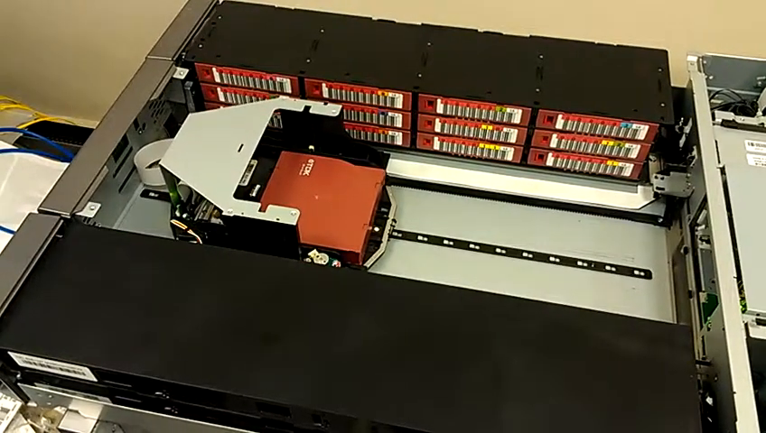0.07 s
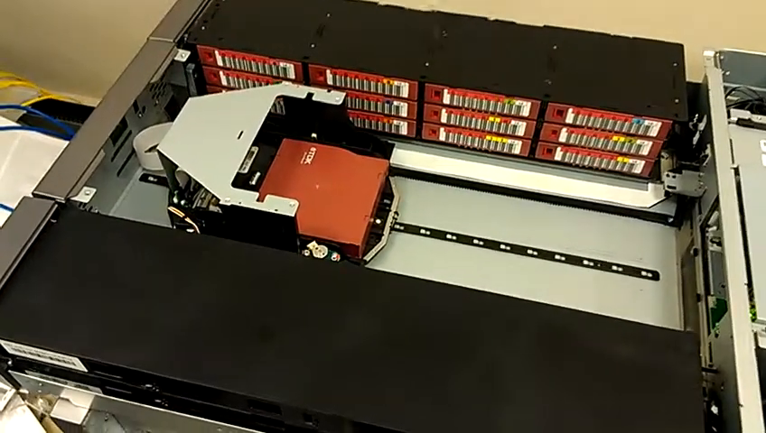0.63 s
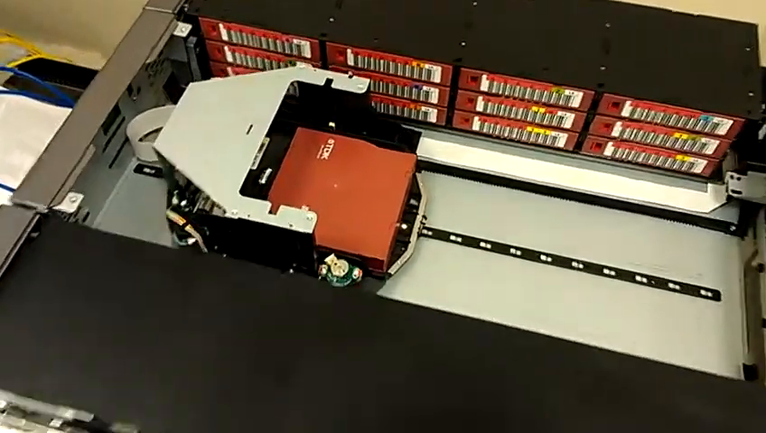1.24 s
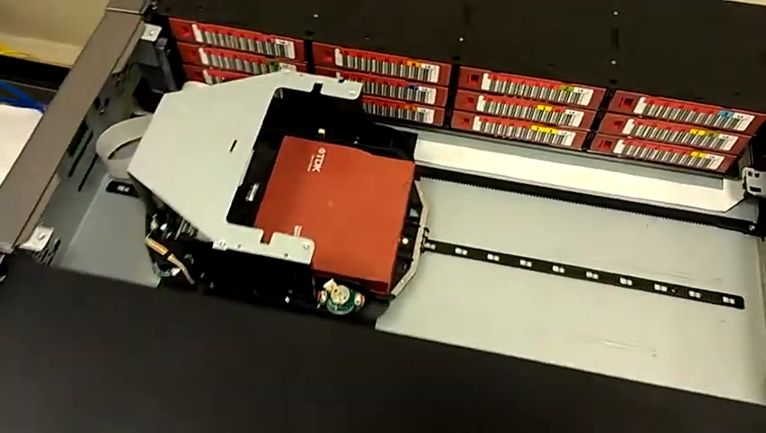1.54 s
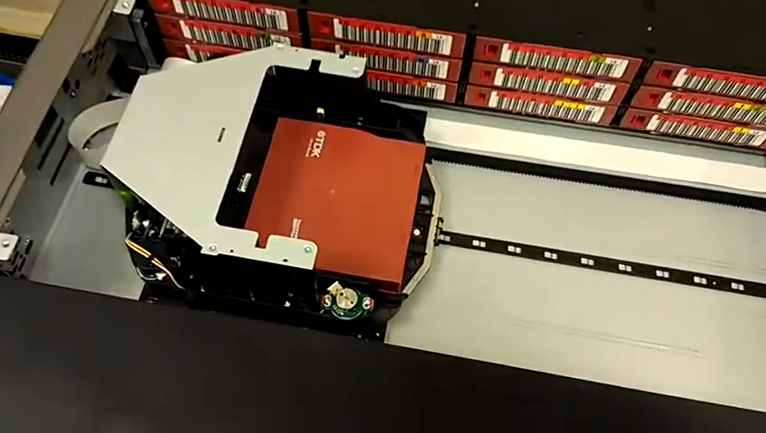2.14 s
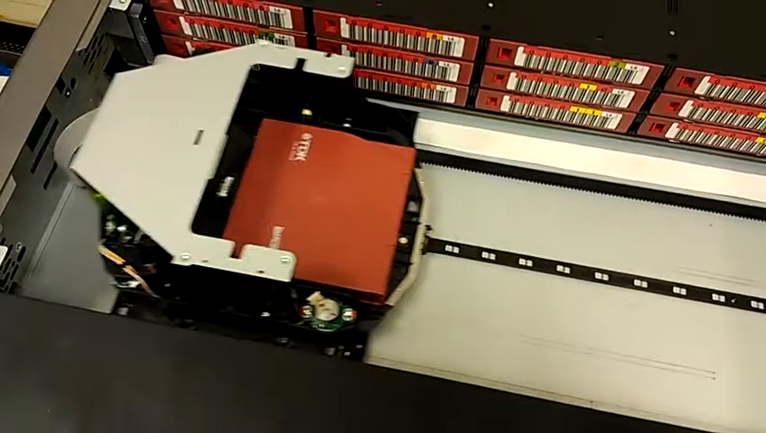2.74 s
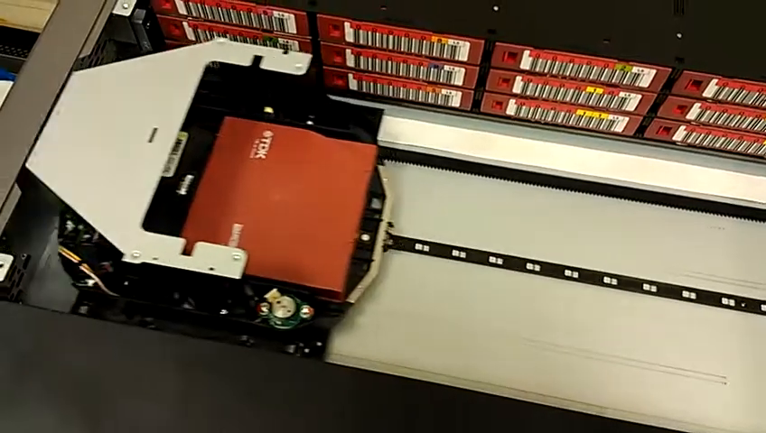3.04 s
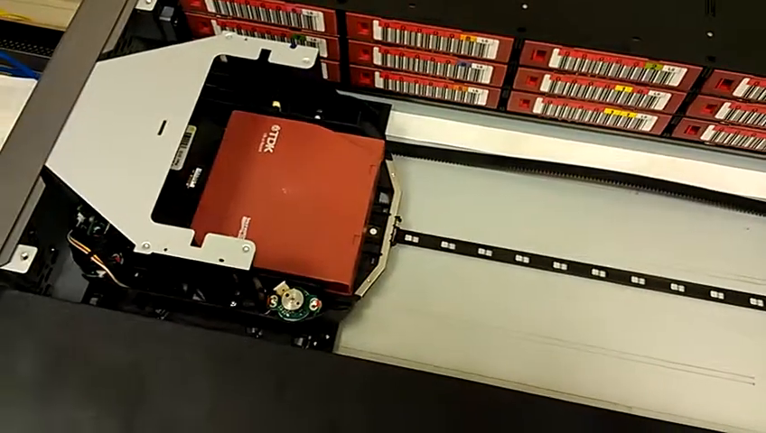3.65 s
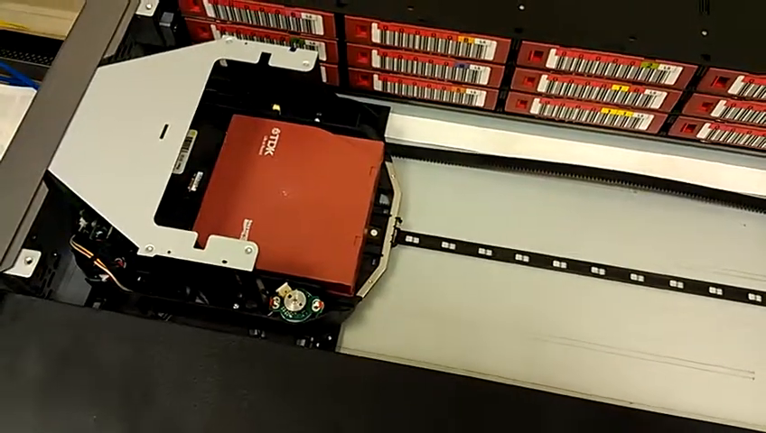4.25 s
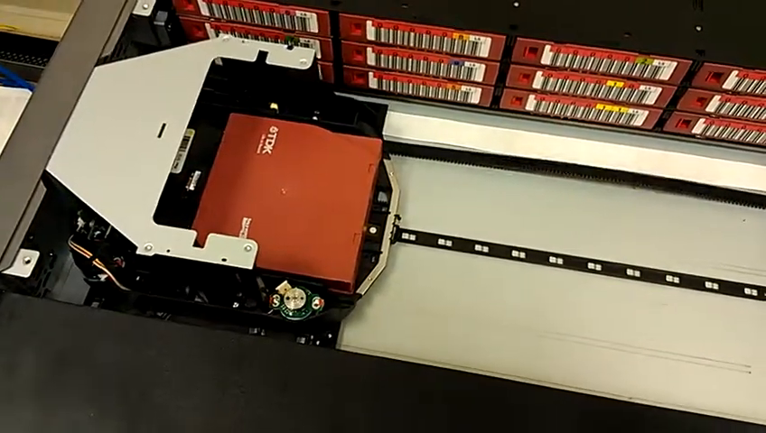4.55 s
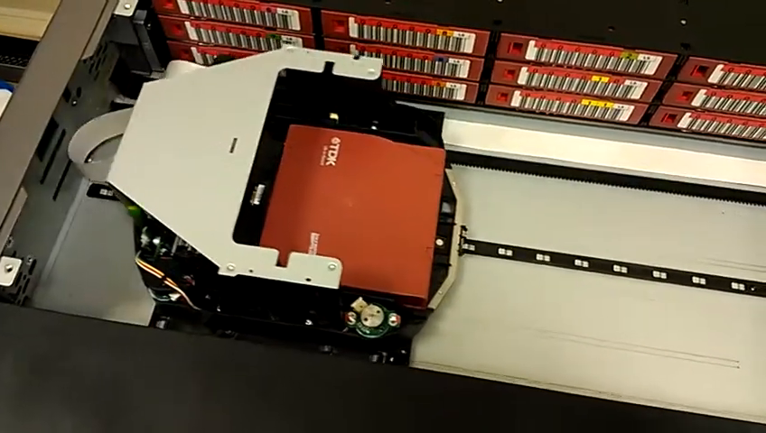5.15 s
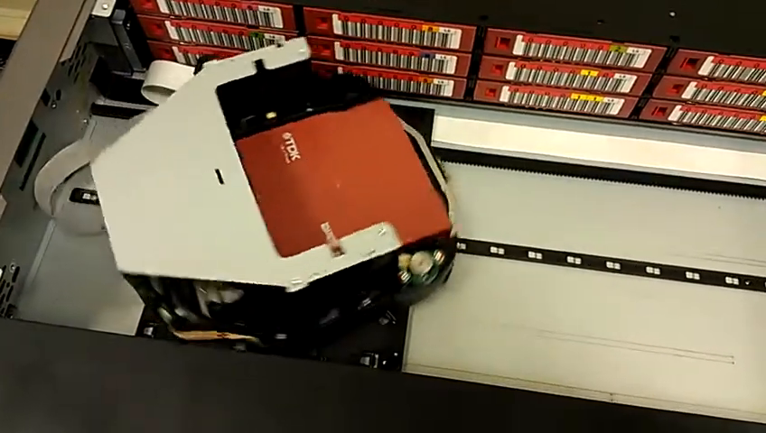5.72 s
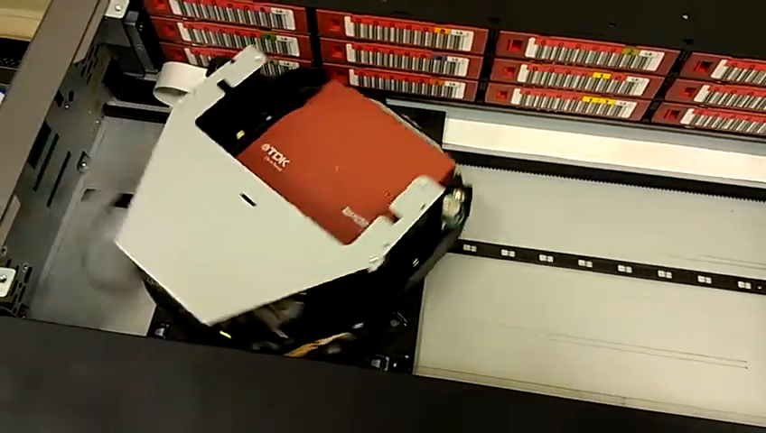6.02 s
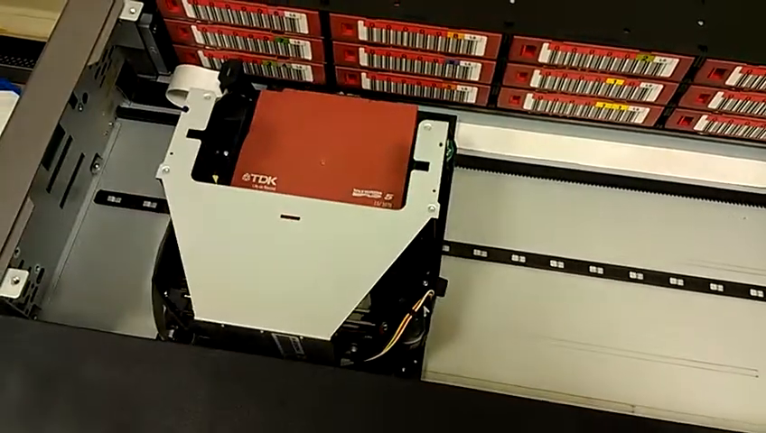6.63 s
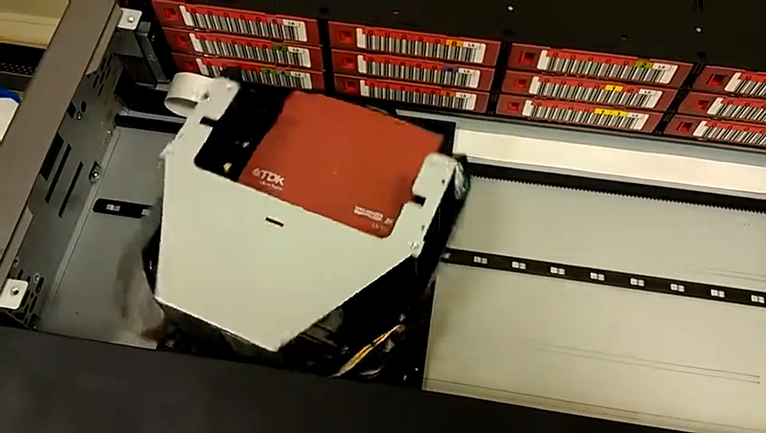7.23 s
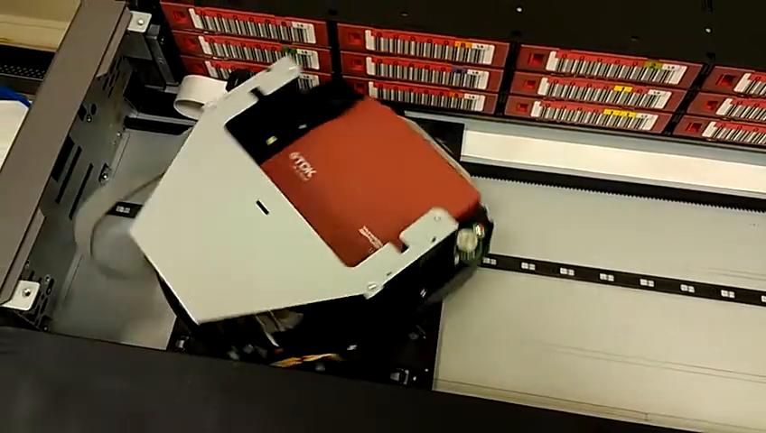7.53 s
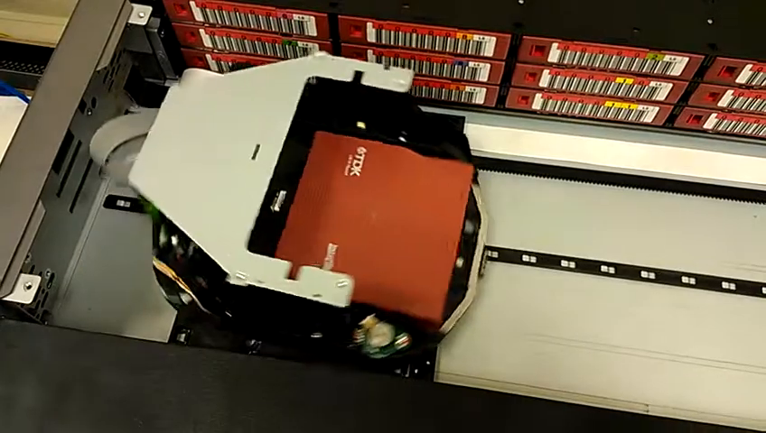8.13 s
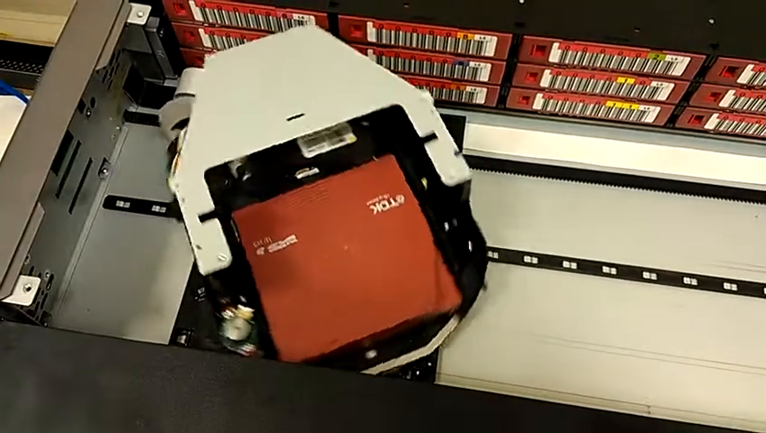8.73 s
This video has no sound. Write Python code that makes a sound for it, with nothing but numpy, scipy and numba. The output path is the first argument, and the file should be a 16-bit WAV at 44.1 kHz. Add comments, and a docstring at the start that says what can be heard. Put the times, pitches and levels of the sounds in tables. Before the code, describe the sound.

Hard clacks, two short motor whines and chattering gears from a robotic tape cartridge picker, over a steady hum of cooling fans.

```python
"""Inside an open tape library, cooling fans hum throughout. The picker grabs a cartridge with a run of
hard clacks: each impact rattles the contacts and rings the plastic body, and the hardest flex the steel
cabinet. A stepper motor, whining at harmonics of its step rate, drives the carriage along its rail twice;
then a chattering gear train swings it round and back. The close two-port microphone ducks and clips on
the hard blows."""
import sys
import numpy as np
from scipy.fft import rfft, irfft, next_fast_len
from scipy.io import wavfile
from scipy.ndimage import uniform_filter1d, map_coordinates
from numba import njit

SR = 44100
rng = np.random.default_rng(int(sys.argv[2]) if len(sys.argv) > 2 else 0)


def persist_wave(psi):
    """Save psi, clipped to +-1, as 16-bit WAV."""
    counts = np.round(np.clip(psi, -1, 1) * 32767).astype(np.int16)
    wavfile.write(sys.argv[1], SR, np.atleast_2d(counts).T)


N = 387198
TIME = np.arange(N) / SR

# loudness of the fans: time_s, level_db
FAN_LEVEL = [(.8, -23), (1.6, -21), (3.5, -23), (4.6, -24), (7, -23), (7.7, -27), (8.78, -30)]
# blade tones: pitch_hz, far_db, near_db, phase_wander_rad
BLADE_TONES = [(426.6, -44, -6, 2.37), (667, -34, -35, 1.6), (776, -12, -20.5, 0.64), (817, -33.5, -6, 1.8),
               (1541, -21, -25, .4), (2320, -23, -21, .8), (3070, -17, -23, .8), (3090, -18, -24, .6),
               (3580, -38, -17.5, 0.64), (3800, -33, -11, 0.84)]
# the microphone leans in over the cabinet: time_s, closeness_share
CLOSENESS = [(.7, 0.37), (2.4, 0.71)]
# spectra of the rushing air, from afar and from near: frequency_hz, density_db
AIR_FAR = [(88, -96), (150, -40), (218, -34.5), (419, -6), (712, -8), (792, -5.5), (865, -11), (1280, -6.5),
           (1420, -31), (1500, -6.5), (2880, -8.5), (3090, 0), (10300, -26.5), (13400, -80), (22000, -120)]
AIR_NEAR = [(88, -89), (150, -60), (289, -12.5), (426, -5), (500, -10.5), (835, -5), (1470, -12.5),
            (1580, -16), (1660, -12.5), (2370, -11), (2680, -16), (3820, -12), (4180, -15.5), (9260, -21),
            (10300, -24.5), (13400, -44), (22000, -120)]
# the picker reaches: start_s, end_s, level_db
REACHES = [(1.12, 1.633, -30.5), (3.347, 4.64, -37.5)]
# the carriage runs out, then back: start_s, end_s, whine_end_s, rolling_db, whine_db
RAIL_RUNS = [(2.695, 3.238, 3.21, -11.5, -10.5), (4.667, 5.24, 5.175, -13, -14.5)]
# spectrum of the rollers on the rail: frequency_hz, density_db
ROLLER_SPECTRUM = [(530, -52), (900, -26), (1310, -19.5), (2040, -10.5), (2450, -1), (3060, -12.5),
                   (3600, -9.5), (4070, -16.5), (4330, -8), (4700, -15), (6640, -13.5), (8930, -18.5),
                   (10300, -35.5), (13400, -64), (22000, -120)]
# overtones of the step rate: harmonic_number, outward_db, return_db
STEP_HARMONICS = [(3, -12.5, -17.5), (4, -3, 1.5), (6, -18.5, -10.5), (7, -20, -22), (8, -17, -11),
                  (9, -21, -28), (10, -25, -11.5), (11, -24, -17), (13, -25, -36), (14, -17.5, -26),
                  (15, -24, -21)]
# modes of the carriage frame: frequency_hz, level_db
FRAME_MODES = [(1800, -2.5), (1900, -4.5), (2110, -0.5), (2260, -8.5), (2350, 0), (2425, -7), (2560, -1),
               (2700, -10), (3580, -10), (3660, 1), (4440, -6), (4660, -6)]
# three slides of the picker, then the turntable's swing round and back: start_s, end_s, level_db
GEAR_RUNS = [(0.902, 1.222, -29.5), (1.26, 1.365, -27), (1.433, 1.546, -26.5), (5.385, 6.468, -11.5),
             (7.07, 8.785, -13)]
# how far the gear side has turned from the shelves: time_s, turned_share
TURNED = [(5.55, 0.66), (5.8, 0.4), (6.2, 1), (7.3, 1), (7.7, 0.4), (7.95, 0.05)]
# spectra of the gears, facing ahead and turned away: frequency_hz, density_db
GEARS_AHEAD = [(530, -53), (900, -18), (1160, -21), (1500, -11.5), (1640, -12.5), (1800, -18.5),
               (1950, -5.5), (2470, -0.5), (3290, -10.5), (3640, -2.5), (5200, -11.5), (6120, -8),
               (6640, -12), (9210, -15), (10300, -23.5), (13400, -47), (22000, -120)]
GEARS_TURNED = [(530, -53), (900, -12), (937, -19), (1170, -12), (1290, -14.5), (1800, -3), (2100, -1.5),
                (2400, 1), (3220, -5.5), (4600, -3), (5150, -5), (6710, -6.5), (7660, -13.5), (9110, -7),
                (10300, -24), (13400, -66), (22000, -120)]
# direction of the turntable: time_s, heading_deg
HEADING = [(5.39, 0), (6.47, 93), (7.06, 98), (8.78, -72)]
# gear noise reflected by nearby steel walls: delay_s, extra_delay_s_per_deg, level_db
WALL_ECHOES = [(.0012, 2e-6, -13.5), (.0019, -1.5e-6, -14.5), (.0027, 2.5e-6, -13.5)]
# latches and end stops snap shut: start_s, level_db, length_s
CLACKS = [(1.426, -9.5, .01), (1.628, 3, .02), (2.019, 1.5, 0.033), (2.066, -5.5, .008), (2.125, 0, 0.034),
          (2.233, 1.5, 0.0028), (2.372, 1.5, 0.019), (2.402, -8, 0.024), (2.659, 1.5, 0.018),
          (3.204, -2.5, .014), (3.304, -10.5, .004), (3.321, -11, 0.0064), (5.366, -5, 0.0073),
          (5.387, -4, .004), (5.425, -5.5, .014), (6.464, -5.5, .018), (7.049, 2, 0.016)]
# sliding parts bind and rattle free: start_s, level_db, length_s
SCRAPES = [(0.943, -16, 0.036), (1.087, -5.5, 0.033), (1.317, -3.5, 0.031), (1.666, 1.5, .02),
           (1.83, 3, 0.021), (2.436, 3, .011), (7.066, -7, 0.035), (7.348, -8.5, 0.02),
           (7.534, -5.5, 0.031), (7.569, -7.5, 0.029), (7.634, -10, 0.045), (7.774, -13.5, 0.023),
           (7.919, -8.5, 0.0183), (8.164, -6, 0.048), (8.464, -6, 0.057), (8.596, -8, 0.027),
           (8.727, -7, 0.032)]
# the hardest blows flex the sheet steel as they end: start_s, rattle_db, length_s, flex_db, lowest_hz
BLOWS = [(1.739, 11, 0.0076, 15.5, 287), (1.763, 10, 0.006, 13, 282), (1.892, 7, 0.008, 6, 400),
         (2.094, 12.5, 0.0091, 10.5, 495), (2.208, 3.5, 0.0089, 6, 290), (2.338, 10, 0.017, 14.5, 290),
         (4.646, 4, .018, 6.5, 277), (5.237, 7, 0.011, 14, 346)]
# spectra of the rattling contacts and of the picker's plastic body: frequency_hz, density_db
RATTLE_SPECTRUM = [(180, -73), (300, -18), (729, -16.5), (1150, -13), (2380, -6), (2970, -3), (4770, -2),
                   (5220, -3.5), (6510, -3), (7660, -8), (8880, -2), (10300, -12), (13400, 2),
                   (22000, -120)]
PLASTIC_SPECTRUM = [(900, -50), (1450, -7), (1900, -10.5), (2350, 3), (2700, -7), (3500, -50), (6000, -60)]


def amp(db):
    """Amplitude ratio of a level in decibels."""
    return 10 ** (np.asarray(db) / 20)


def unit(x):
    """Normalisation to rms 1."""
    return x / np.sqrt(np.mean(x ** 2) + 1e-20)


def curves(rows):
    """Linear interpolation in time of each column after the first."""
    s, *cols = np.transpose(rows)
    return [np.interp(TIME, s, c) for c in cols]


def running(start, end, spin_up_s=.012, run_down_s=0.014):
    """Trapezoidal envelope of a motor that starts, runs and stops."""
    return np.clip((TIME - start) / spin_up_s, 0, 1) * np.clip((end - TIME) / run_down_s + 1, 0, 1)


def settling(start, first_db, settle_s):
    """Starting transient: a gain whose level relaxes exponentially from first_db to 0 dB."""
    return amp(first_db * np.exp(-np.maximum(TIME - start, 0) / settle_s))


def wobble(rate):
    """Smooth random modulation of rms 1, with rate knots a second."""
    return unit(map_coordinates(rng.standard_normal(int(N * rate / SR) + 4), [TIME * rate], order=2))


def filtered(x, response):
    """Linear filtering: the spectrum of x times a frequency response."""
    size = next_fast_len(N + 8192)
    return irfft(rfft(x, size) * response(np.fft.rfftfreq(size, 1 / SR)), size)[..., :N]


def coloured(x, spectrum):
    """Spectral shaping by (frequency_hz, density_db) points, at rms 1."""
    f, db = np.transpose(spectrum)
    return unit(filtered(x, lambda hz: amp(np.interp(np.log(hz + 1), np.log(f), db))))


def blended(x, first, second, share):
    """Change of timbre by a crossfade between two spectral envelopes."""
    return (1 - share) * coloured(x, first) + share * coloured(x, second)


def grit(rate, share):
    """Friction noise with a share of its power in tiny random impacts, rate a second."""
    impacts = unit((rng.random(N) < rate / SR) * rng.uniform(-1, 1, N))
    return np.sqrt(share) * impacts + np.sqrt(1 - share) * rng.standard_normal(N)


def cabinet(x, direct_share, twist_rad):
    """Partial coherence: two ports share direct sound out of phase; each adds noise as diffuse echo."""
    knots_hz = np.linspace(0, SR / 2, num=60)
    lead = twist_rad * rng.uniform(-1, 1, len(knots_hz))
    direct = filtered(x, lambda hz: np.exp(1j * np.outer([1, -1], np.interp(hz, knots_hz, lead))))
    return np.sqrt(direct_share) * direct + np.sqrt(1 - direct_share) * rng.standard_normal((2, N))


def placed(x, left_db):
    """A level difference between the ports places a sound to the left."""
    return x * amp([[left_db / 2], [-left_db / 2]])


def tone(phase, spread_rad):
    """A sinusoid of rms 1 with a phase difference between the ports."""
    lead = rng.choice([-1, 1]) * spread_rad
    return np.sqrt(2) * np.sin(phase + np.array([[lead], [-lead]]))


def fans():
    """Aerodynamic noise: rushing air and unsteady blade tones, whose balance shifts with distance."""
    near = curves(CLOSENESS)[0]
    flow = cabinet(rng.standard_normal(N), direct_share=0.66, twist_rad=1.0)
    air = blended(flow, AIR_FAR, AIR_NEAR, near)
    blades = 0
    for hz, far_db, near_db, wander in BLADE_TONES:
        level = amp(far_db + near * (near_db - far_db) + 1.4 * wobble(8.5))
        blades = blades + level * tone(2 * np.pi * hz * TIME + wander * wobble(18), spread_rad=0.15)
    return placed(amp(curves(FAN_LEVEL)[0]) * (air + blades), left_db=4.0)


def picker_motor(pitch_hz=1545):
    """A pure tone with slight amplitude modulation: the small motor sings while the picker reaches."""
    level = sum(amp(db) * running(start, end) for start, end, db in REACHES)
    return level * amp(0.6 * wobble(29)) * tone(2 * np.pi * pitch_hz * TIME, spread_rad=0.71)


def rail_drive(step_hz=617.7, rack_hz=47.5):
    """Periodic forcing: the stepper sounds harmonics of its step rate; the rack modulates the rolling."""
    step_phase = 2 * np.pi * step_hz * TIME + .05 * wobble(45) + .035 * wobble(260)
    rack = amp(np.sin(2 * np.pi * rack_hz * TIME + wobble(8)) + .7 * wobble(25))
    friction = cabinet(grit(rate=2500, share=0.52), direct_share=0.39, twist_rad=0.99)
    rolling = rack * coloured(friction, ROLLER_SPECTRUM)
    multiples, *directions = np.transpose(STEP_HARMONICS)
    overtones = [amp(2.2 * wobble(110)) * tone(round(k) * step_phase, spread_rad=.5) for k in multiples]
    out = 0
    for (start, end, whine_end, rolling_db, whine_db), overtone_db in zip(RAIL_RUNS, directions):
        whine = sum(amp(whine_db + db) * overtone for db, overtone in zip(overtone_db, overtones))
        pull_away = settling(start, first_db=3.5, settle_s=0.05)
        build_up = settling(start, first_db=-16, settle_s=0.077)
        out = out + running(start, end) * pull_away * amp(rolling_db) * rolling
        out = out + running(start, whine_end) * build_up * whine
    return placed(out, left_db=4.0)


def frame_ring(width_hz, vary_db):
    """Modal resonance: narrow noise bands, rms 1 in all, whose strengths vary as the parts shift."""
    out = 0
    for hz, db in FRAME_MODES:
        phase = 2 * np.pi * hz * TIME
        in_phase = wobble(2 * width_hz) * tone(phase, spread_rad=1.0)
        quadrature = wobble(2 * width_hz) * tone(phase + np.pi / 2, spread_rad=1.0)
        out = out + amp(db + vary_db * wobble(7.8)) * (in_phase + quadrature)
    return unit(out)


def wall_reflections(x):
    """Comb filtering: echoes interfere with the direct sound along paths that vary with the heading."""
    heading, out = curves(HEADING)[0], x
    for delay, per_degree, db in WALL_ECHOES:
        earlier = (TIME - delay - per_degree * heading) * SR
        out = out + amp(db) * np.array([map_coordinates(port, [earlier], order=2) for port in x])
    return unit(out)


def gears(shaft_hz=23.7, ring_db=-5.0):
    """Amplitude modulation: each shaft turn swells the chatter of plastic teeth and the frame's ring."""
    # the teeth are loaded hardest at the start
    level = sum(amp(db) * running(start, end) * settling(start, first_db=6.5, settle_s=0.17)
                for start, end, db in GEAR_RUNS)
    shaft = 2 * np.pi * shaft_hz * TIME + wobble(4.5)
    mesh = unit(amp(1.17 * np.sin(shaft) + 0.69 * np.sin(2 * shaft) + wobble(160)))
    teeth = cabinet(grit(rate=2000, share=.25), direct_share=.58, twist_rad=.8)
    chatter = blended(wall_reflections(teeth), GEARS_AHEAD, GEARS_TURNED, curves(TURNED)[0])
    ring = amp(ring_db) * frame_ring(width_hz=32, vary_db=2.5)
    return placed(level * mesh * (chatter + ring), left_db=4.5)


def panel_thumps(sweep_hz=5000, glide_s=.0014, peak_s=0.0047, width_s=0.0044, echo_db=-11, echo_s=.008):
    """Dispersion: high bending waves in steel outrun low ones, so a blow sweeps down; a wall echoes it."""
    out, t = np.zeros(N), TIME[:SR // 10]
    swell = np.exp(-((t - peak_s) / width_s) ** 2)
    for s, _, length, db, lowest_hz in BLOWS:
        hz = lowest_hz + sweep_hz * np.exp(-t / glide_s)
        chirp = np.sin(2 * np.pi * np.cumsum(hz) / SR)
        out[round((s + length - peak_s) * SR):][:len(t)] += amp(db) * swell * chirp
    echo = filtered(out, lambda hz: amp(echo_db) * np.exp(-2j * np.pi * hz * echo_s))
    return placed(np.array([out + echo, out - echo]), left_db=3.5)


def contacts(impact_rise_s=0.0048, scrape_rise_share=0.41):
    """Impacts start abruptly, friction swells: rows of start_s, level_db, rise_s, length_s."""
    sudden = [(s, db, impact_rise_s, length) for s, db, length, *_ in CLACKS + BLOWS]
    return sudden + [(s, db, scrape_rise_share * length, length) for s, db, length in SCRAPES]


def clacks(rattle_t60_s=0.071, ring_t60_s=0.08, ring_db=-4.5, ring_growth=0.68):
    """Impact excitation and damped decay: contacts rattle, and the plastic body and frame ring on."""
    force, ring = np.zeros(N), np.zeros(N)
    for s, db, rise, length in contacts():
        onset = round(s * SR)
        t = TIME[:min(SR // 3, N - onset)]
        build, after = np.minimum(t / rise, 1), np.maximum(t - length, 0)
        force[onset:][:len(t)] += build * amp(db - 60 * after / rattle_t60_s)
        # the ring grows less than the force, so it stands out most after soft blows
        ring[onset:][:len(t)] += build * amp(ring_growth * db + ring_db - 60 * after / ring_t60_s)
    flutter = amp(2.8 * wobble(250))
    impacts = cabinet(grit(rate=2500, share=0.62), direct_share=0.56, twist_rad=0.95)
    rattle = force * flutter * coloured(impacts, RATTLE_SPECTRUM)
    shake = cabinet(rng.standard_normal(N), direct_share=0.49, twist_rad=0.44)
    plastic = coloured(shake, PLASTIC_SPECTRUM)
    body = ring * unit(plastic + amp(3.0) * frame_ring(width_hz=55, vary_db=2.0))
    return placed(rattle + body, left_db=5.5)


def scene():
    """Superposition of all sources at the two microphone ports."""
    return fans() + picker_motor() + rail_drive() + gears() + clacks() + panel_thumps()


@njit
def follow(x, attack, release):
    """Envelope follower: a first-order lag with rise and fall time constants in samples."""
    y, state = np.empty_like(x), 0.
    for i in range(len(x)):
        state += (x[i] - state) / (attack if x[i] > state else release)
        y[i] = state
    return y


def ducked(x, limit_db, share, attack_s, release_s):
    """Dynamic compression: a share of the level above the limit is taken away."""
    power = np.abs(uniform_filter1d(np.mean(x ** 2, axis=0), size=180))
    excess_db = np.maximum(10 * np.log10(power + 1e-12) - limit_db, 0)
    return x * amp(-share * follow(excess_db, attack_s * SR, release_s * SR))


def record(dry):
    """Band limiting and saturation: a microphone, slow levelling, a fast limiter and soft clipping."""
    low_hz, high_hz, output_top_hz = 207, 10075, 14200
    x = filtered(dry, lambda hz: 1 / np.sqrt((1 + (low_hz / (hz + 1)) ** 14) * (1 + (hz / high_hz) ** 60)))
    x = ducked(x, limit_db=-19, share=.45, attack_s=0.1, release_s=0.28)
    x = ducked(x, limit_db=-3.0, share=0.97, attack_s=0.0038, release_s=0.17)
    clipped = x / (1 + np.abs(x) ** 12) ** (1 / 12)
    return filtered(clipped, lambda hz: 1 / np.sqrt(1 + (hz / output_top_hz) ** 60))


dry = scene()
out = record(dry)
persist_wave(out)
```